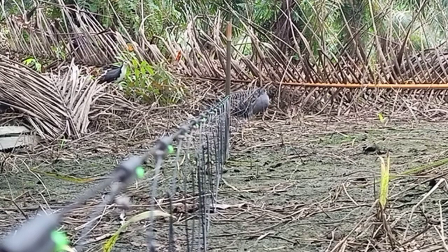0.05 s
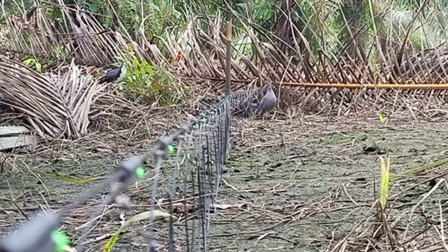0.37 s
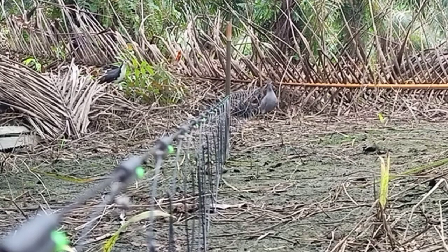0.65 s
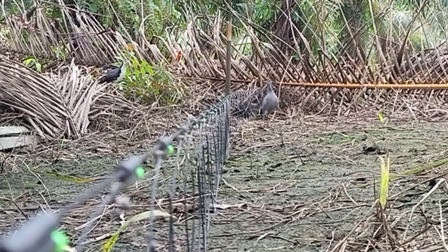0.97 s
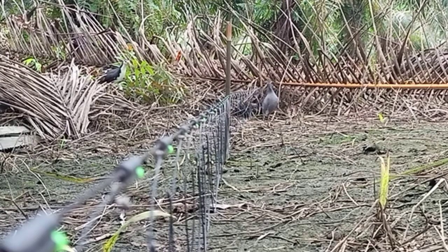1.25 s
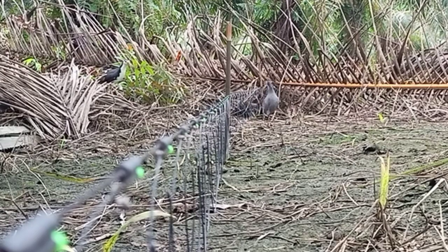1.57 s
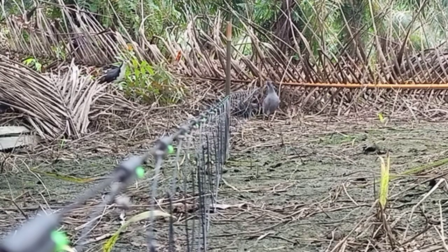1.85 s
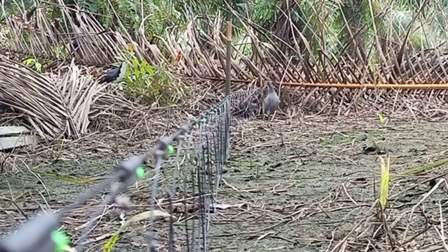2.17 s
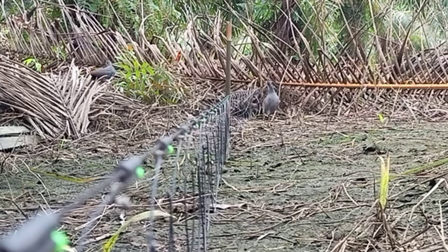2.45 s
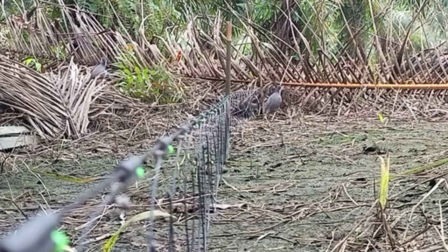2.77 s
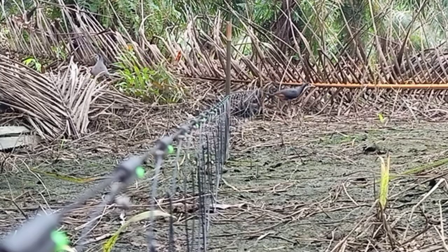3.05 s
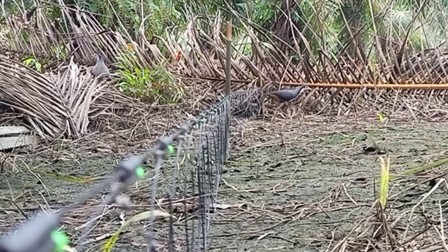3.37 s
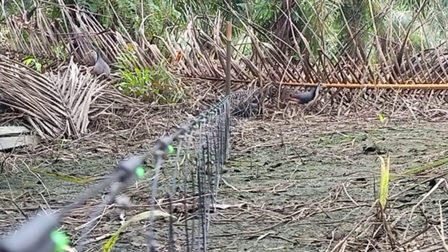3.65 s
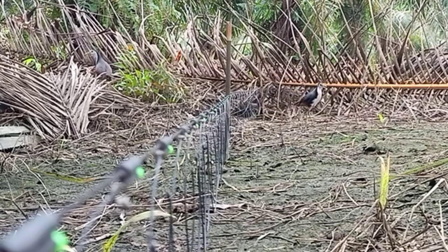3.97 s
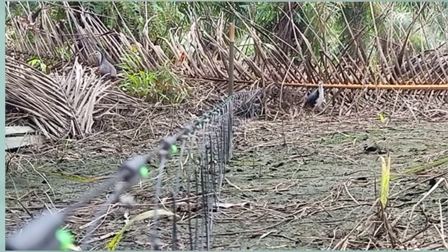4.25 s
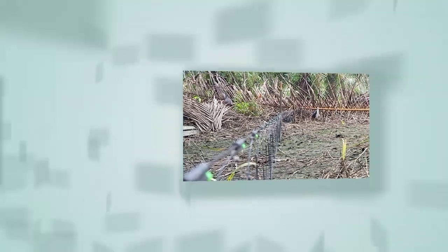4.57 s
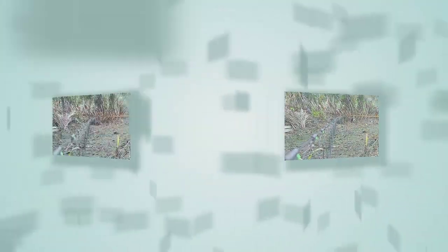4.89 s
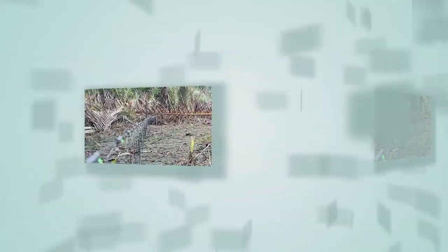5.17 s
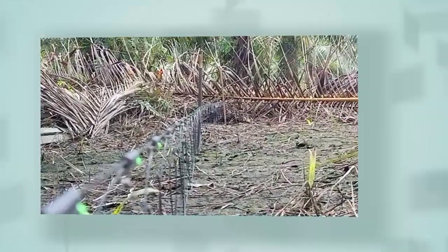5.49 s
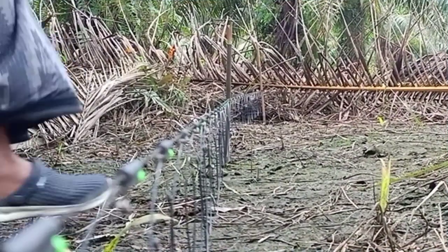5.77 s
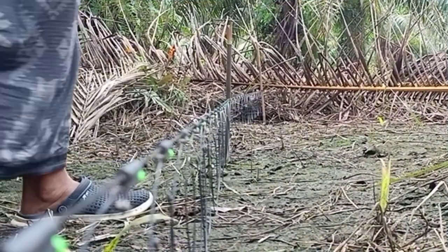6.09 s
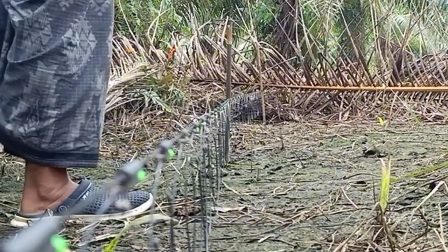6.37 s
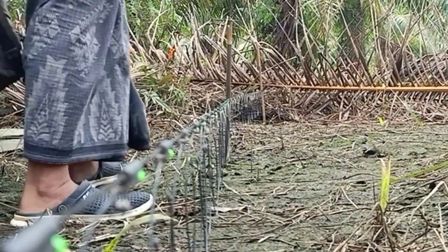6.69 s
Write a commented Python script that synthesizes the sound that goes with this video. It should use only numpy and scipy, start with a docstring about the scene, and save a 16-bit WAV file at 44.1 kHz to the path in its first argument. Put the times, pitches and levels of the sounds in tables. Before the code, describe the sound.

Beside a muddy ditch edged with palms, one bird gives about ten evenly spaced calls, each a croak leaping to a whistle, loud and clear with a slight echo. Another clucks quickly and quietly over a steady high insect drone. The last two calls fade and the clucking stops, as a faint distant engine hum comes up with light crackling of dry leaves.

```python
"""A loud, repeated croak that leaps into a whistle, over a chatter of short rising clucks: two waterhens
beside a muddy ditch edged with palms. The croak is a period-doubled syrinx, each cluck a quickening pulse
train through throat and beak. Insects drone all round, far birds hoot and whistle, dry fronds crackle,
and the low firing orders of a distant engine come up as the calling dies away."""
import sys
import numpy as np
from scipy import signal
from scipy.fft import rfft, irfft, next_fast_len
from scipy.io import wavfile
from scipy.ndimage import map_coordinates

SR = 44100
rng = np.random.default_rng(int(sys.argv[2]) if len(sys.argv) > 2 else 0)


def materialize(psi):
    """Save the field psi as 16-bit PCM at rate SR to the path in sys.argv[1].

    A 1-D psi becomes a single channel; in a 2-D psi each row is a channel.
    """
    bounded = np.clip(np.atleast_2d(psi).T, -1, 1)
    quanta = np.round(bounded * 32767).astype(np.int16)
    wavfile.write(sys.argv[1], SR, quanta)


N = 305613
T = np.arange(N) / SR


def undb(db):
    """Decibels to gain."""
    return 10 ** (np.asarray(db) / 20)


def unit(x):
    """Scale to rms 1."""
    return x / np.sqrt(np.mean(x ** 2) + 1e-20)


def phase_of(hz):
    """Running phase in radians."""
    return 2 * np.pi * np.cumsum(hz) / SR


def curves(rows, t=T):
    """Value columns of a (t/s, value, ...) table at times t."""
    times, *columns = np.transpose(rows)
    return [np.interp(t, times, column) for column in columns]


def response(spectrum, hz):
    """Gain of an (f/Hz, level/dB) spectrum at hz."""
    points_hz, db = np.transpose(spectrum)
    return undb(np.interp(np.log(hz + 1), np.log(points_hz), db))


def noise(spectrum, size=N):
    """Noise of rms 1 with an (f/Hz, level/dB) spectrum."""
    n = next_fast_len(size)
    gain = response(spectrum, np.arange(n // 2 + 1) * SR / n)
    return unit(irfft(rfft(rng.standard_normal(n)) * gain, n)[:size])


def band(x, hz, width_hz):
    """One resonance applied twice."""
    b, a = signal.iirpeak(hz, hz / width_hz, fs=SR)
    return signal.lfilter(b, a, signal.lfilter(b, a, x))


def walk(rate_hz, t=T):
    """Smooth random curve of spread near 1."""
    knots = rng.standard_normal(4096)
    return map_coordinates(knots, [(t - t[0]) * rate_hz], order=2, mode="wrap")


def rise(t, width):
    """Smooth 0-to-1 step centred on t = 0."""
    return .5 + .5 * np.sin(np.pi * np.clip(t / width, -.5, .5))


def add(out, start_s, x):
    """Mix x into out from start_s."""
    i = max(int(start_s * SR), 0)
    out[i:i + len(x)] += x[:N - i]


def delay(x, ms):
    """Fractional-sample delay."""
    n = next_fast_len(N + SR // 4)
    hz = np.arange(n // 2 + 1) * SR / n
    return irfft(rfft(x, n) * np.exp(-2j * np.pi * hz * ms / 1000), n)[:N]


def place(x, lag_ms, pan_db):
    """Direct sound in stereo; positive lag and pan put it to the left."""
    return np.array([x * undb(pan_db / 2), delay(x, lag_ms) * undb(-pan_db / 2)])


def grove(x, low_db, high_db, low_t60_s, high_t60_s):
    """Stereo scatter from trunks and fronds, which throw back the upper partials best."""
    t = T[:SR * 3 // 4]
    sides = []
    for _ in range(2):
        low = noise([(150, 0), (1300, 0), (1800, -30), (3000, -70)], len(t))
        high = noise([(1200, -60), (1800, 0), (5500, 0), (9000, -30)], len(t))
        tail = low * undb(low_db - 60 * t / low_t60_s) + high * undb(high_db - 60 * t / high_t60_s)
        sides.append(signal.fftconvolve(x, tail * rise(t - .012, .09) / np.sqrt(SR))[:N])
    return np.array(sides)


# Open-air spectrum: f/Hz, relative level/dB
AIR_SPECTRUM = [(20, -26), (45, -4), (80, -2), (130, 2.5), (200, -5.5), (350, -12), (700, -12.5),
                (1200, -16), (2500, -18), (4500, -32.5), (8500, -42), (10500, -57)]
# Open-air envelope: t/s, level/dB
AIR_ENVELOPE = [(0, -68), (4.3, -69.5), (4.85, -76), (5.4, -66), (6.93, -70)]


def air():
    """Far rumble, alike in both ears, under a faint wash of leaves; the level dips briefly."""
    db, = curves(AIR_ENVELOPE)
    mid = noise(AIR_SPECTRUM) * undb(.4 * walk(31))
    diffuse = noise(AIR_SPECTRUM)
    side = .2 * diffuse + .75 * signal.lfilter(*signal.butter(1, 500, "high", fs=SR), diffuse)
    return undb(db) * np.array([mid + side, mid - side])


# Chorus envelope: t/s, relative level/dB
INSECT_ENVELOPE = [(0.0, -50), (0.07, -50.5), (3.98, -50), (4.42, -51), (4.77, -55.5), (5.19, -59),
                   (5.88, -53.5), (6.93, -55.5)]
# Spectra of the early drone, late drone and high sizzle: f/Hz, relative level/dB
EARLY_DRONE_SPECTRUM = [(2710, -60), (4600, -57), (4920, -25.5), (5940, -14.5), (6820, 5.5), (7170, 8.5),
                        (7550, 2), (8280, -19.5), (9250, -31), (9600, -50.5), (12500, -82), (21100, -120)]
LATE_DRONE_SPECTRUM = [(2710, -29.5), (4600, -30.5), (5790, -15), (6430, -1.5), (6780, 4.5), (7320, -0.5),
                       (7460, -6.5), (8010, -20), (9080, -29), (9600, -49), (12500, -91), (21100, -120)]
SIZZLE_SPECTRUM = [(11000, -46.5), (13200, -12), (14200, -8), (15300, 2.5), (16000, -8)]


def insects(beat_hz=93, detune=.0019):
    """A chorus pulsing with its muscle beat; near 5 s the drone sinks in pitch and the sizzle drops."""
    db, = curves(INSECT_ENVELOPE)
    beat = 1 + .12 * np.sin(phase_of(beat_hz + .5 * walk(5.6)))
    late = rise(T - 5, .84)
    drone_db, sizzle_db = db + 3, db - 20.5 - 4.5 * late
    sides = []
    for side in (1, -1):  # left, right
        early_song, late_song = (noise([(hz * (1 - detune * side), level) for hz, level in spectrum])
                                 for spectrum in (EARLY_DRONE_SPECTRUM, LATE_DRONE_SPECTRUM))
        song = np.sqrt(1 - late) * early_song + np.sqrt(late) * late_song
        drone = song * beat * undb(drone_db + .55 * walk(40))
        sizzle = noise(SIZZLE_SPECTRUM) * undb(sizzle_db - 4.9 * side)
        sides.append(drone + sizzle)
    return np.array(sides)


# Engine envelope, faint and then nearer: t/s, relative level/dB
ENGINE_FAINT_ENVELOPE = [(0.7, -79), (1.93, -68.5), (2.42, -79.5), (3.98, -73), (4.8, -89)]
ENGINE_NEAR_ENVELOPE = [(4.92, -80), (5.64, -53.5), (5.8, -66), (6.01, -54), (6.2, -73), (6.25, -59),
                        (6.51, -74.5), (6.73, -57), (6.93, -60)]
# Firing orders: multiple of the cycle rate, relative level/dB
FIRING_ORDERS = [(1, -21.5), (2, -5.5), (3, 5), (4, -8), (5, -20.5)]


def engine(idle_hz=42.5, speed_up_s=5.45, ramp_hz_per_s=4.5):
    """Only the lowest firing orders of a far engine carry, fading in and out as it picks up speed."""
    db, = curves([*ENGINE_FAINT_ENVELOPE, *ENGINE_NEAR_ENVELOPE])
    cycle_hz = idle_hz + ramp_hz_per_s * np.maximum(T - speed_up_s, 0)
    phase = phase_of(cycle_hz * (1 + .012 * walk(25)))
    hum = sum(undb(order_db + 1.5 * walk(8.8)) * np.sin(k * phase) for k, order_db in FIRING_ORDERS)
    return place(unit(hum) * undb(db + 1), lag_ms=-.2, pan_db=.2)


# Frond rustles: t/s, length/s, level/dB, centre f/Hz
FROND_RUSTLES = [(2.347, 0.075, -64, 4800), (2.622, 0.18, -73.5, 4220), (5.133, 0.049, -61.5, 2140),
                 (5.686, 0.21, -78.5, 2164), (5.975, 0.063, -64, 2550), (5.98, 0.12, -68, 693),
                 (6.079, 0.15, -80, 2600)]


def fronds():
    """Dry fronds crackle in short showers of tiny snaps."""
    dry = np.zeros(N)
    for start_s, length_s, db, hz in FROND_RUSTLES:
        n = int(length_s * SR)
        snaps = rng.standard_normal(n) * undb(5.5 * np.minimum(rng.exponential(size=n), 6.5))
        shower = band(snaps, hz, width_hz=1.2 * hz) * np.hanning(n) ** .5
        add(dry, start_s, undb(db) * unit(shower))
    scatter = grove(dry, low_db=-11, high_db=11.5, low_t60_s=.23, high_t60_s=.35)
    return place(dry, lag_ms=.059, pan_db=0) + scatter


# Low hoots and a small bird's thin whistles: t/s, length/s, f/Hz, glide/Hz, level/dB
FAR_HOOTS = [(.13, .45, 307.6, -8.5, -73.5), (.818, 0.13, 295, -4.5, -72), (2.747, 0.08, 230.5, 14, -59),
             (2.96, .11, 241.4, 18.5, -52.5), (3.042, 0.19, 295, 48, -51), (3.219, 0.11, 245, 21.5, -52.5),
             (3.426, 0.22, 301.6, -9, -49.5), (3.489, 0.11, 239, 8.5, -53),
             (3.909, 0.24, 294.5, -3.5, -52.5)]
FAR_WHISTLES = [(5.23, 0.14, 2700, -120, -78), (5.33, .16, 2970, 236, -83), (6.07, .09, 2820, -390, -75.5)]


def far_birds(sag_hz_per_s=55):
    """Near-sine notes, smeared by the trees; each glides, wavers and sags mid-note, more when long."""
    dry = np.zeros(N)
    for start_s, length_s, pitch_hz, glide_hz, db in [*FAR_HOOTS, *FAR_WHISTLES]:
        t = T[:int((length_s + .04) * SR)]
        along = np.minimum(t / length_s, 1) - .5
        sag_hz = sag_hz_per_s * length_s * ((2 * along) ** 2 - 1 / 3)
        hz = (pitch_hz + glide_hz * along + sag_hz) * (1 + .01 * walk(14, t))
        envelope = rise(t - .025, .034) * rise(length_s - t, .081) * undb(.89 * walk(17, t))
        add(dry, start_s, np.sqrt(2) * undb(db) * np.sin(phase_of(hz)) * envelope)
    scatter = grove(dry, low_db=-6, high_db=-2, low_t60_s=.6, high_t60_s=.4)
    return place(dry, lag_ms=-.37, pan_db=-1.5) + scatter


# Throat response: f/Hz, gain/dB
THROAT_RESPONSE = [(300, -16.5), (450, -3.5), (800, -3.5), (1120, 2.5), (1400, -4), (1900, -26.5),
                   (3000, -32.5), (4500, -42)]
# Beak resonance, set by how far it opens: t/s, f/Hz, gain/dB
BEAK_RESONANCE = [(0, 2650, -1), (1.6, 1833, -4.5), (2.3, 1644, -3.5), (3.4, 1580, -13.5),
                  (3.65, 2424, -13.5), (3.93, 3090, -4), (4.15, 2290, -3.5), (4.6, 2450, -2.5),
                  (4.85, 1826, -3.5)]


def throat_and_beak(hz, start_s, t):
    """Seven harmonics of a pulse train through the open beak and the throat, whose ringing lags them."""
    beak_hz, beak_db = curves(BEAK_RESONANCE, start_s)
    phase = phase_of(hz)
    voice = 0
    for k in range(1, 8):
        beak = undb(beak_db) / (1 + 1j * (k * hz - beak_hz) / 260) ** 3
        lag_rad = 2 * np.arctan((k * hz - 1000) / 300)
        throat = response(THROAT_RESPONSE, k * hz) * np.exp(-1j * lag_rad)
        voice += np.real((throat + beak) * np.exp(1j * k * phase)) * undb(walk(99, t))
    return voice


# Clucks: t/s, relative level/dB
CLUCK_EVENTS = [(0.037, -48), (0.217, -51), (0.339, -47.5), (0.394, -49), (0.492, -46), (0.584, -47),
                (0.669, -44), (0.764, -46), (0.863, -45.5), (0.967, -47), (1.063, -48.5), (1.163, -47.5),
                (1.243, -44), (1.344, -50), (1.435, -46), (1.517, -45.5), (1.598, -46.5), (1.681, -46.5),
                (1.769, -46), (1.857, -46.5), (1.944, -48.5), (2.021, -46.5), (2.151, -44.5), (2.226, -49),
                (2.328, -49), (2.468, -50.5), (3.271, -56), (3.346, -54), (3.408, -50), (3.498, -50),
                (3.578, -53.5), (3.631, -47), (3.68, -50.5), (3.814, -46), (3.932, -45), (4.066, -46.5),
                (4.123, -45), (4.246, -44.5), (4.438, -44), (4.499, -46.5), (4.606, -47), (4.685, -48.5),
                (4.825, -49), (4.904, -48), (5.009, -54), (5.092, -52), (5.17, -50.5), (5.245, -53.5),
                (5.332, -56.5), (5.45, -61)]
# Pitch late in a cluck's rise: time since the previous cluck/s, f/Hz
CLUCK_PITCH_BY_GAP = [(.055, 989), (.08, 1082), (.1, 1035), (.13, 966)]


def clucking_hen(slur_s=.06):
    """Each cluck is a pulse train, uneven at first, that speeds up out of a throaty rattle."""
    dry = np.zeros(N)
    t = T[:SR // 16] - .015
    unsteady = np.exp(-np.abs(t - .004) / .008)
    gaps_s = np.diff([start_s for start_s, _ in CLUCK_EVENTS], prepend=-1)
    for (start_s, db), gap_s in zip(CLUCK_EVENTS, gaps_s):
        # a cluck hard on the heels of another starts higher and eases in
        floor_hz, attack_s = (545, .02) if gap_s < slur_s else (411.5, .008)
        target_hz = curves(CLUCK_PITCH_BY_GAP, gap_s)[0] * (1 + .025 * rng.standard_normal())
        bend = 1.1 + .18 * rng.standard_normal()
        sweep = np.minimum(.4 + .59 * (np.maximum(t, 0) / .02) ** bend, 1.22)
        jitter = 1 + .13 * unsteady * walk(330, t) + .02 * walk(150, t)
        hz = np.maximum(target_hz * sweep, floor_hz) * jitter
        voice = throat_and_beak(hz, start_s, t)
        voice *= rise(t - .0015, attack_s) * rise(.0258 - t, .011)
        voice *= 1 - .25 * unsteady + .2 * unsteady * walk(400, t)
        rattle = noise([(250, -30.5), (420, 6.5), (750, -7), (1250, -1.5), (1600, -10),
                        (2600, -35.5), (6000, -66)], len(t))
        rattle *= undb(1.5) * unsteady * rise(t - .0015, .009)
        add(dry, start_s + t[0], undb(db - 3.5) * (unit(voice) + rattle))
    scatter = grove(dry, low_db=2.5, high_db=15.5, low_t60_s=.14, high_t60_s=.21)
    return place(dry, lag_ms=.085, pan_db=0) + scatter


def croak_tone(phase, croak_db, overtone_db, roughness, t):
    """Period doubling puts a line at each half multiple of the pitch, each shaking on its own."""
    lines = [(.5, croak_db - 31), (1, croak_db), (1.5, overtone_db),
             (2, overtone_db - 13), (2.5, overtone_db - 32), (3, overtone_db - 21)]
    return sum(undb(db) * (1 + .55 * roughness * walk(260, t)) * np.cos(k * phase) for k, db in lines)


def whistle_tone(phase, hz, t):
    """A near-sine with faint, hoarse third and fifth harmonics."""
    third = (1 + .45 * walk(350, t)) * np.cos(3 * phase + .65 * walk(350, t))
    fifth = rise(5 * hz - 4950, 300) * np.cos(5 * phase + 1.1 * walk(330, t))
    return np.cos(phase) + undb(-48) * np.cos(2 * phase) + undb(-31) * third + undb(-49) * fifth


def throat_burst(t):
    """The first burst of air rings the throat, dropping in pitch."""
    hz = 1020 + 330 * np.exp(-t / .0032)
    return np.exp(-((t - .004) / .0013) ** 2) * np.sin(phase_of(hz))


def loud_call(level_db, whistle_hz, croak_offset_db, roughness, leap_s=.04, whistle_s=.053):
    """The syrinx starts period-doubled and rasping, then leaps to a clean whistle."""
    end_s = leap_s + whistle_s
    t = T[:int((end_s + .04) * SR)]
    since_leap_s = np.maximum(t - leap_s, 0)
    whistling = rise(t - leap_s - .001, .029)
    croaking = 1 - whistling

    croak_hz = .7 * whistle_hz
    glide = 1 - np.exp(-(since_leap_s / .01) ** .97)
    hz = croak_hz + (whistle_hz - croak_hz + 9) * glide - 6 * rise(t - end_s, .03)
    hz *= 1 + .06 * roughness * croaking * walk(380, t) + .003 * walk(200, t)
    phase = phase_of(hz)

    croak_db = level_db + croak_offset_db
    overtone_db = level_db - 21.5 + 11.5 * roughness
    croak = croak_tone(phase, croak_db, overtone_db, roughness, t)
    croak *= rise(t - .004, .008) * croaking * undb(4 * (t / leap_s - .6))
    burst = undb(level_db - 8) * throat_burst(t)

    whistle_db = level_db - .8 - 4 * (1 - glide) - 12 * (since_leap_s - .035)
    whistle_gain = whistling * undb(whistle_db) * rise(end_s + .002 - t, .015)
    whistle = whistle_gain * whistle_tone(phase, hz, t)

    breath = noise([(300, -14), (1000, -1), (1700, -4), (2400, 0), (2700, 3.5), (3050, 10.5),
                    (3500, -13.5), (4000, -20), (4500, -34.5), (5300, -13), (9000, -59)], len(t))
    breath *= (undb(-26.5) * whistle_gain * (1.6 - glide)
               + undb(croak_db - 29) * rise(t - .003, .004) * croaking)
    # chaotic flapping fills the gaps between the croak's lines
    growl = noise([(250, -35.5), (480, -6), (640, -1), (900, 6.5), (1350, 1), (1500, -5.5),
                   (1650, -18.5), (2300, -56)], len(t))
    growl *= roughness * undb(croak_db - 5) * rise(t - .002, .004) * rise(leap_s + .0086 - t, .015)
    call = np.sqrt(2) * (croak + burst + whistle) + breath + growl
    return call * rise(t - .0015, .003)


# Loud calls: t/s, level/dB, nominal whistle f/Hz, croak re whistle/dB, roughness/0-1
LOUD_CALLS = [(0.110, -18.5, 1066, -14, .45), (0.680, -18.5, 1080, -8, .2), (1.249, -18.5, 1074, -11, .3),
              (1.868, -18.5, 1074, -15, .8), (2.476, -18.5, 1078, -18, .85), (3.136, -18.5, 1085, -9, .45),
              (3.703, -18.5, 1093, -9, .5), (4.281, -18.5, 1086, -11, .65), (4.921, -26.5, 1084, -16, .6),
              (5.526, -44.5, 1072, -13, .8)]


def loud_hen():
    """The loud bird, with a quick echo off the bank and two later ones off the palms."""
    dry = np.zeros(N)
    for start_s, *voice in LOUD_CALLS:
        add(dry, start_s, loud_call(*voice))
    bank = undb(-14) * delay(dry, ms=8.62)
    reflected = band(dry, hz=1085, width_hz=600)
    palms = undb(-22.5) * delay(reflected, ms=48) + undb(-32) * delay(reflected, ms=78)
    scatter = grove(dry, low_db=-25, high_db=-1, low_t60_s=.5, high_t60_s=.5)
    return place(dry + bank + palms, lag_ms=.21, pan_db=-2) + scatter


def scene():
    """Stereo mix at the edge of the ditch."""
    return loud_hen() + clucking_hen() + far_birds() + fronds() + engine() + insects() + air()


def record(dry):
    """Steep elliptic low-pass."""
    cutoff_hz = 15600
    return signal.sosfilt(signal.ellip(10, .2, 80, cutoff_hz, fs=SR, output="sos"), dry)


dry = scene()
out = record(dry)
materialize(out)
```